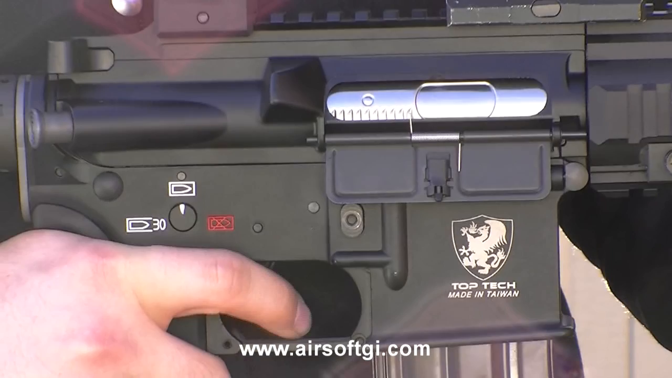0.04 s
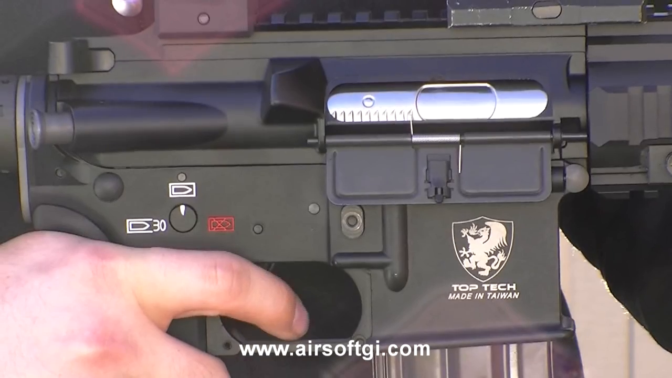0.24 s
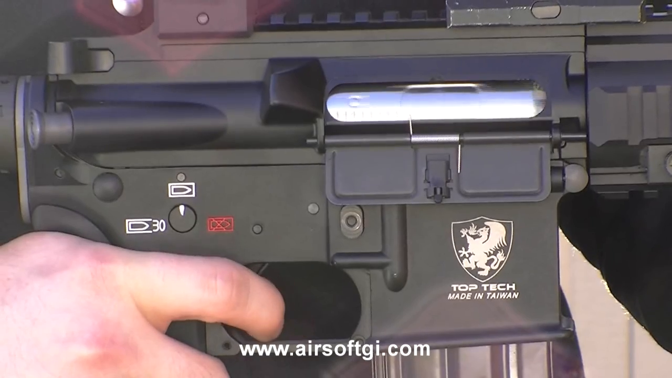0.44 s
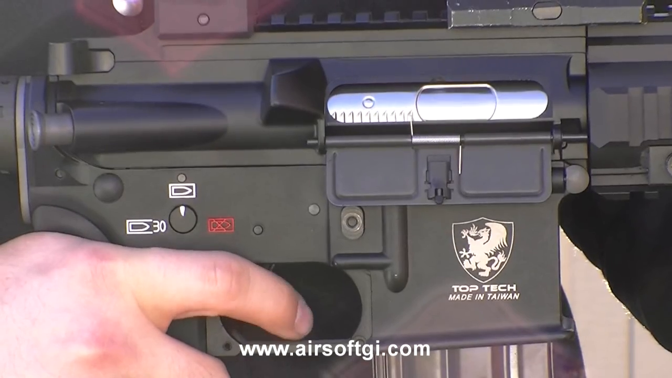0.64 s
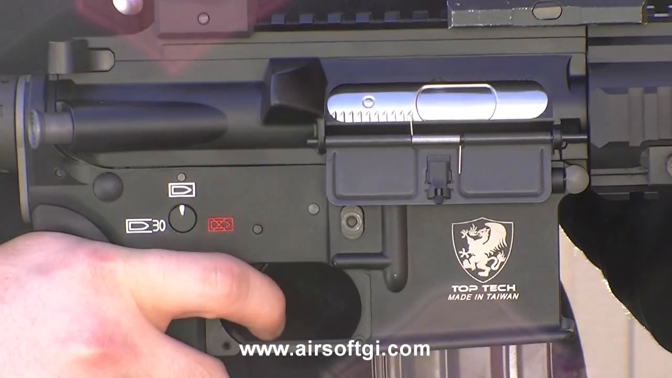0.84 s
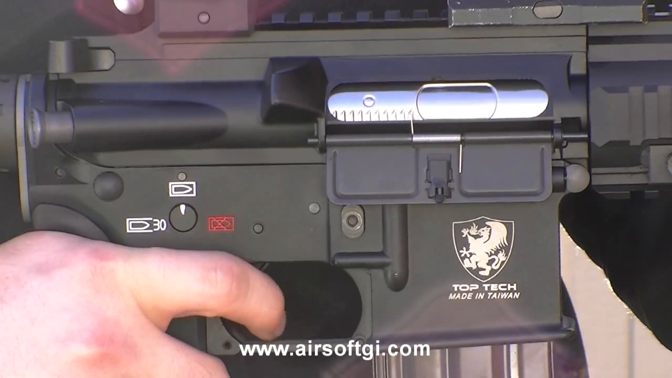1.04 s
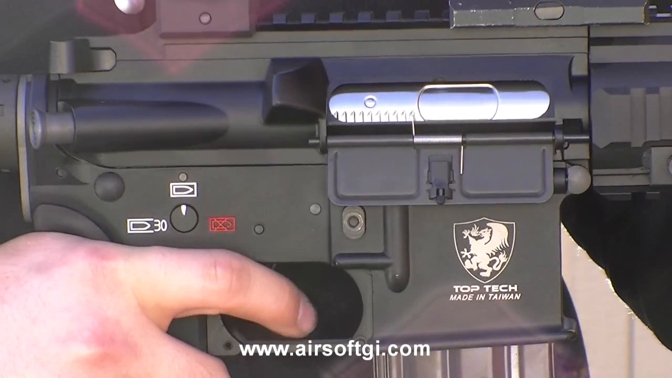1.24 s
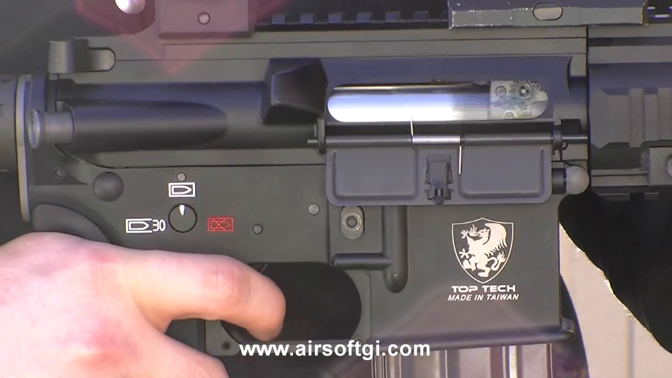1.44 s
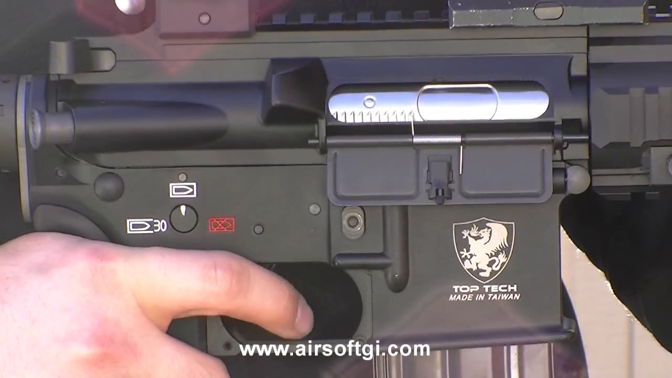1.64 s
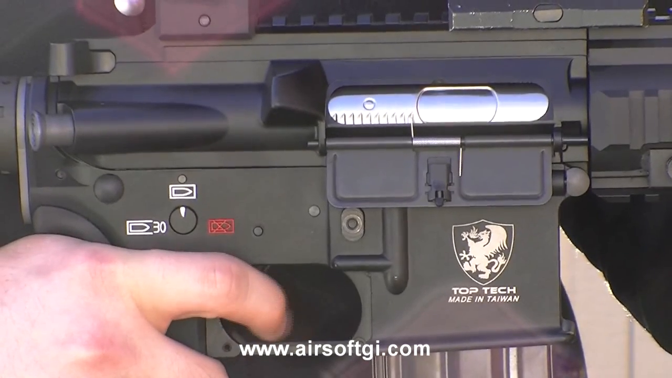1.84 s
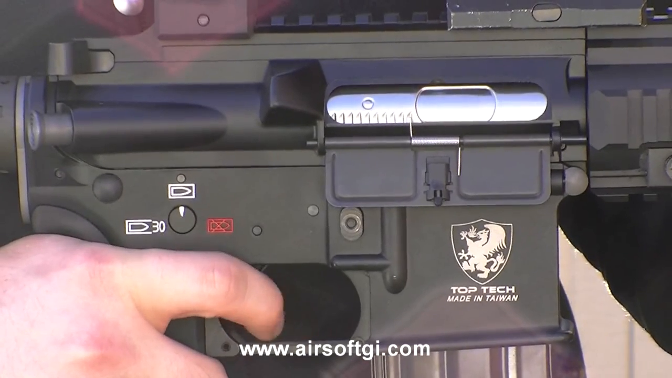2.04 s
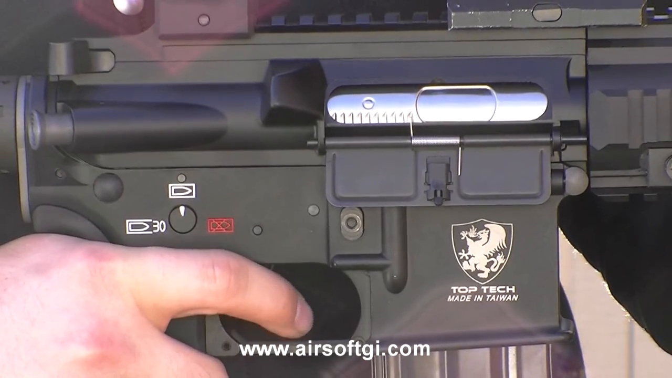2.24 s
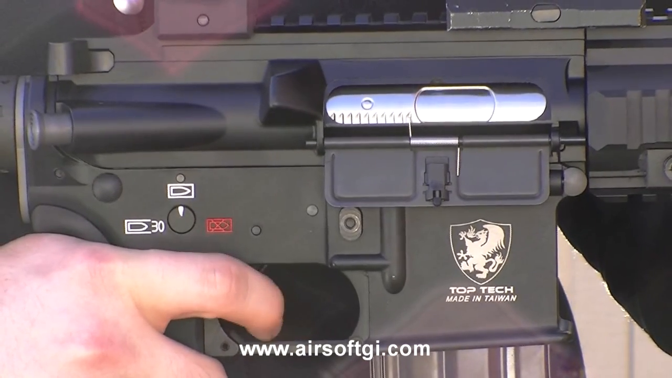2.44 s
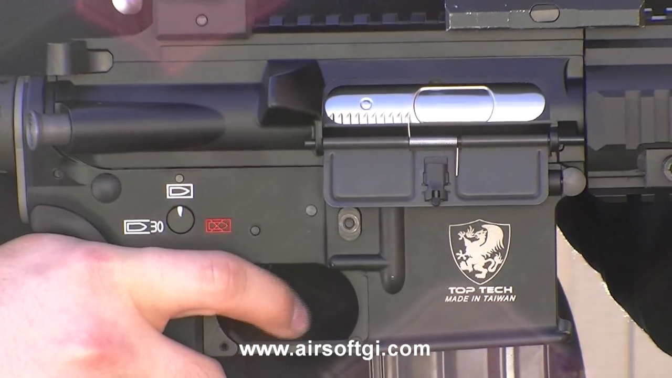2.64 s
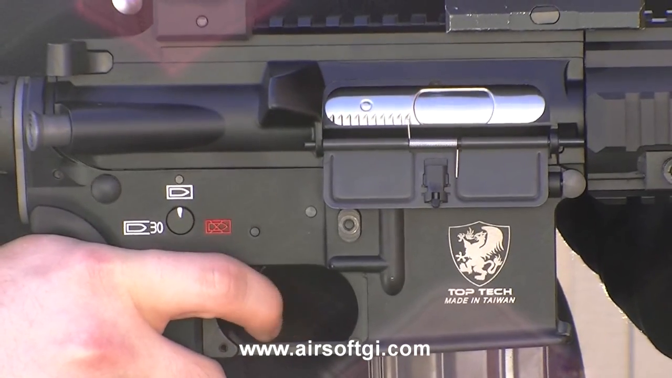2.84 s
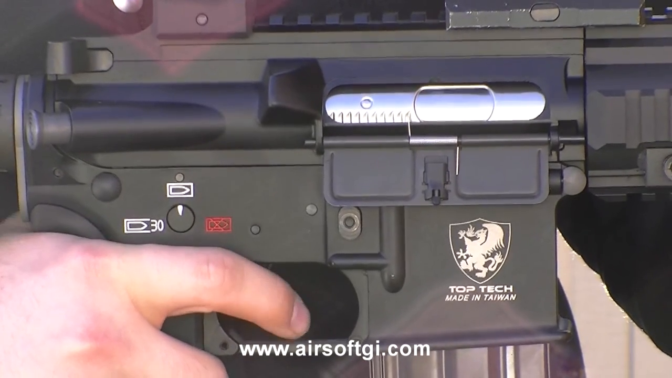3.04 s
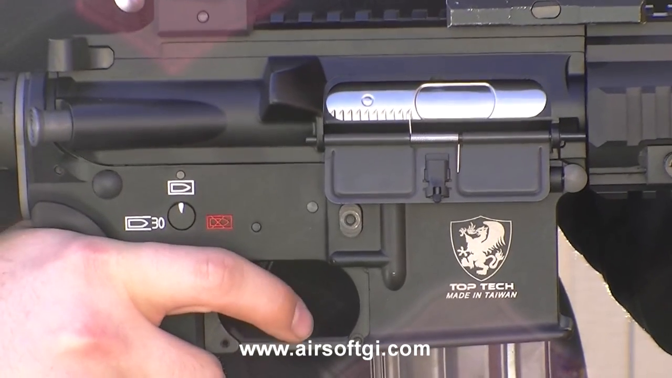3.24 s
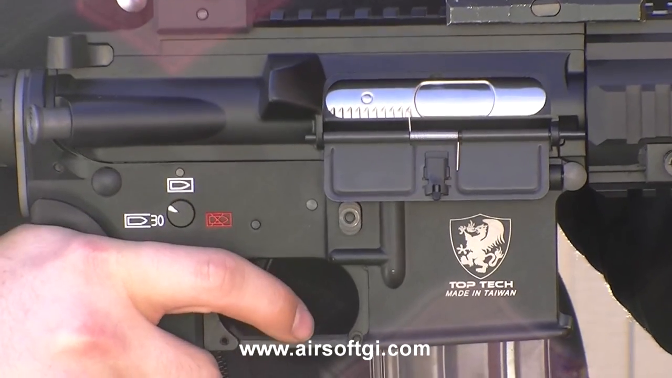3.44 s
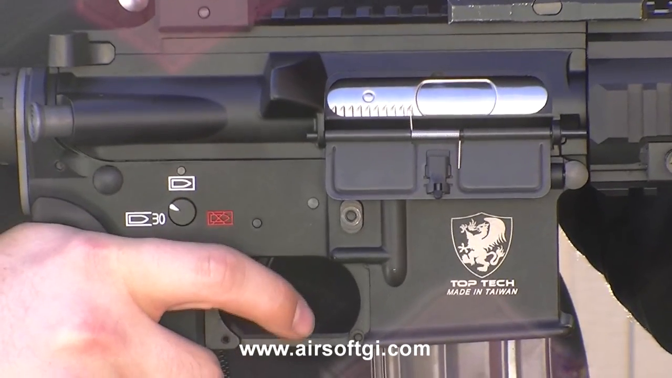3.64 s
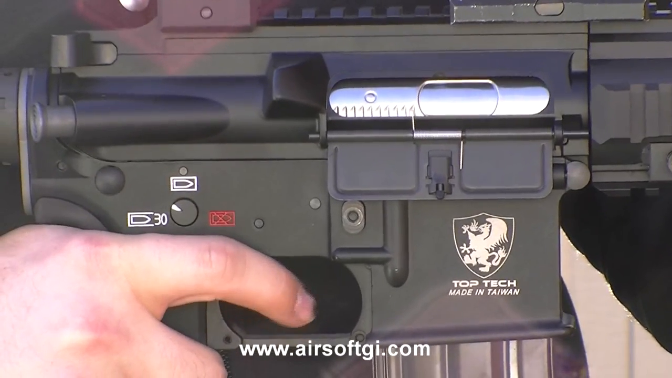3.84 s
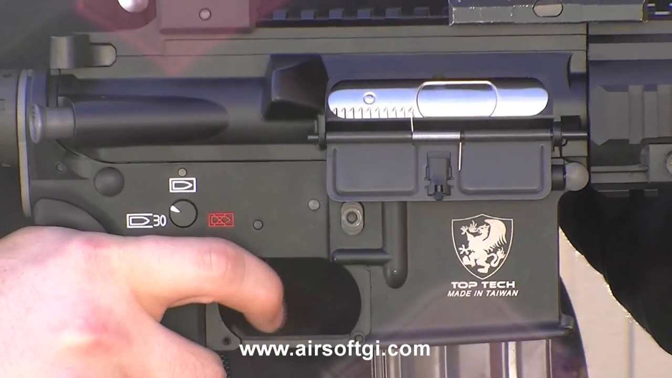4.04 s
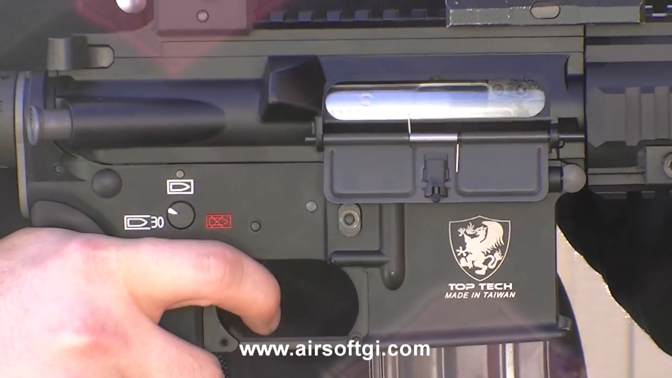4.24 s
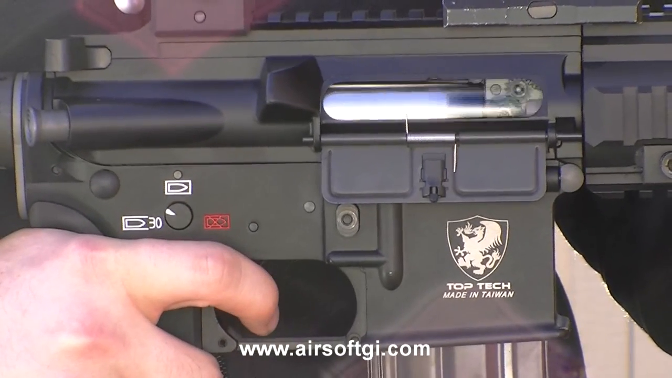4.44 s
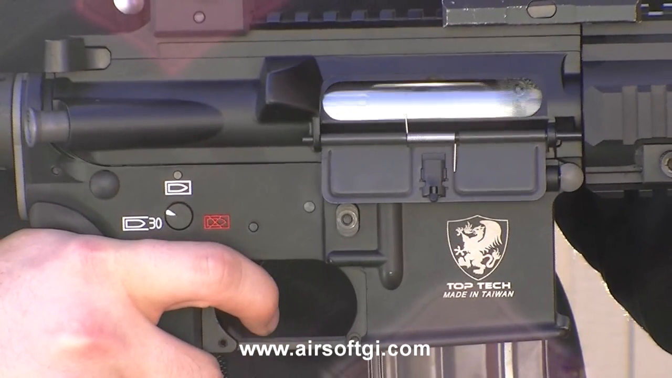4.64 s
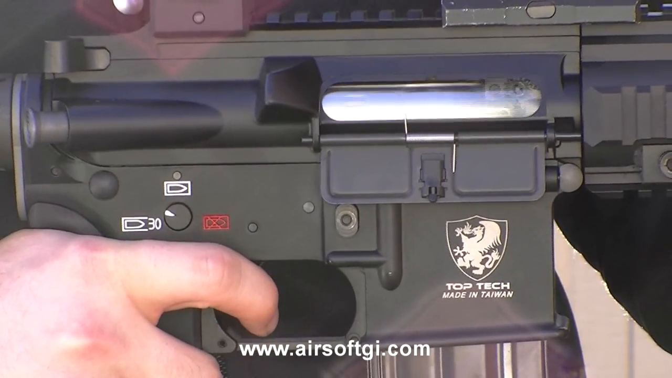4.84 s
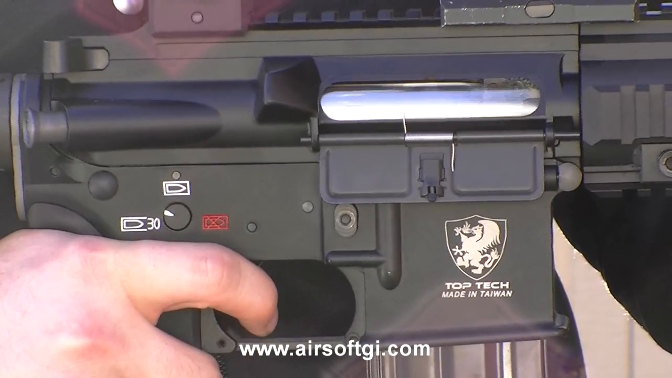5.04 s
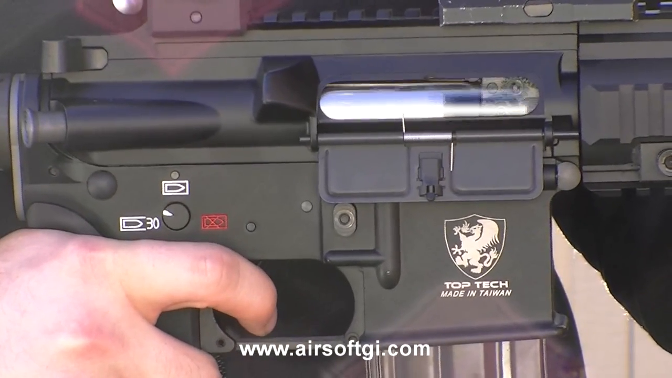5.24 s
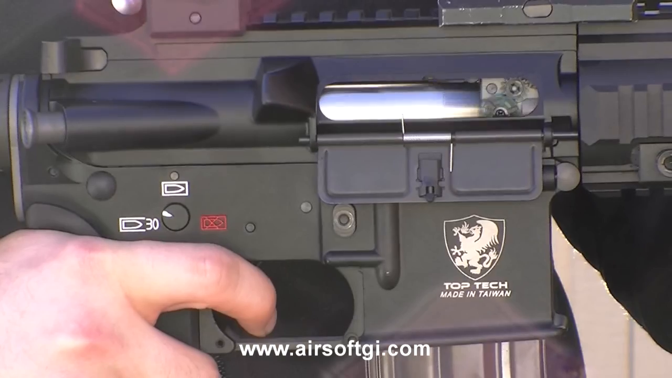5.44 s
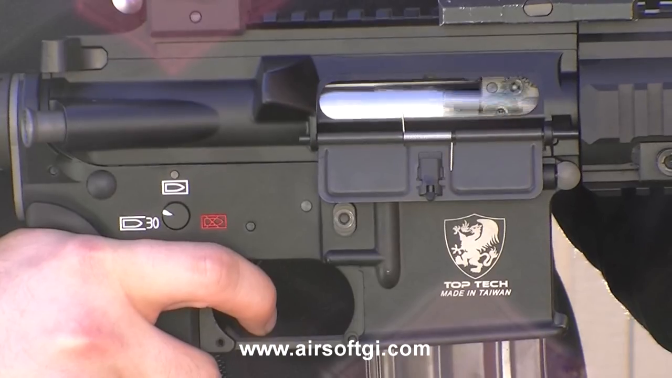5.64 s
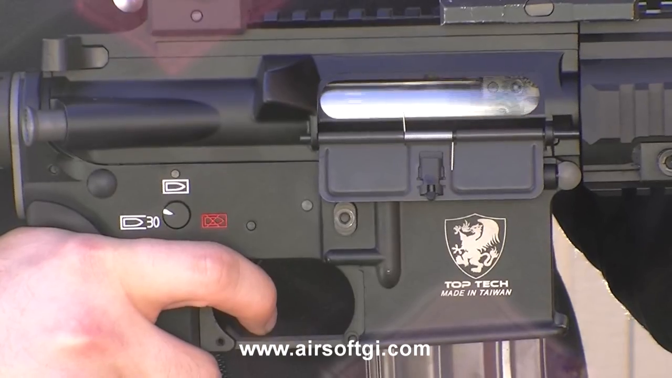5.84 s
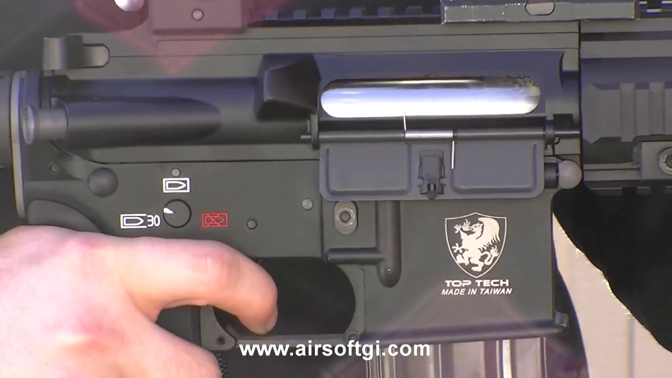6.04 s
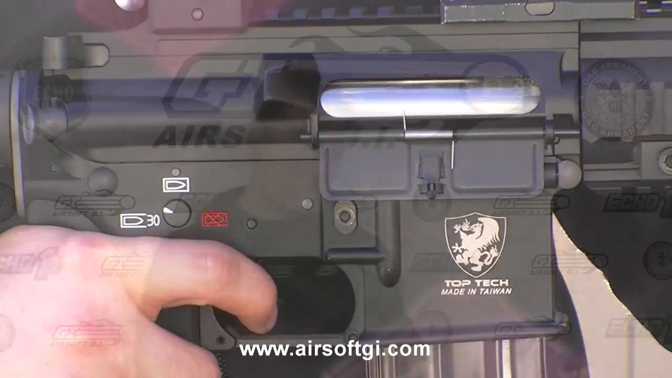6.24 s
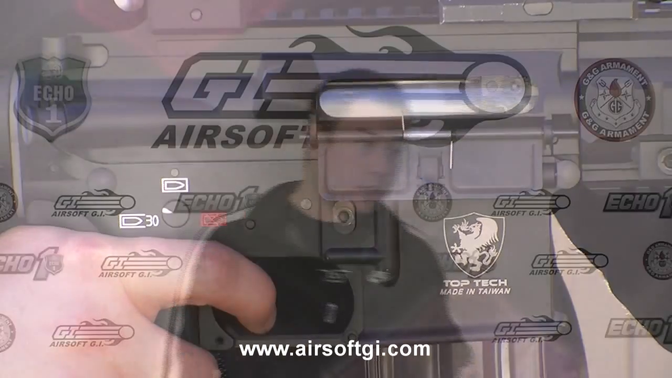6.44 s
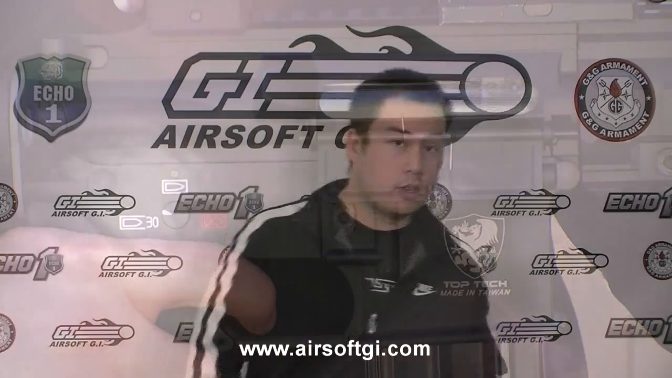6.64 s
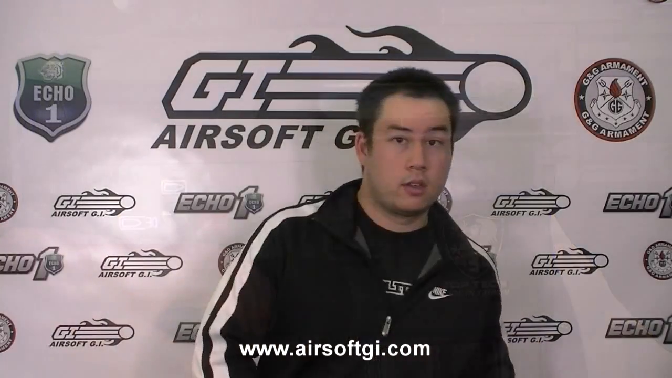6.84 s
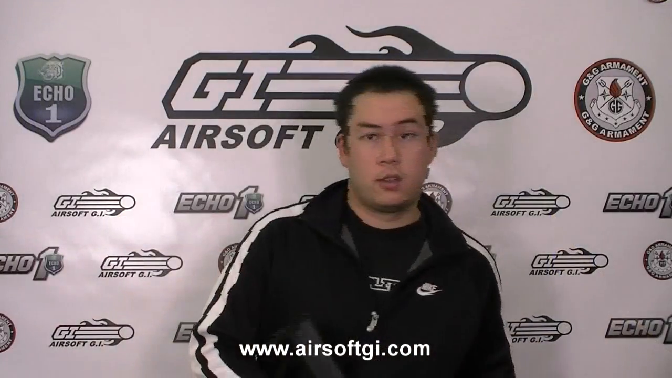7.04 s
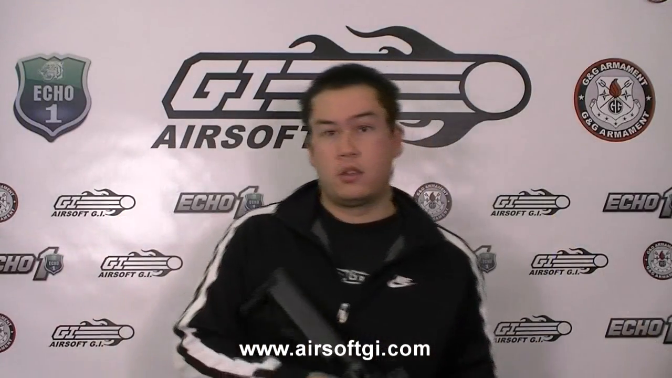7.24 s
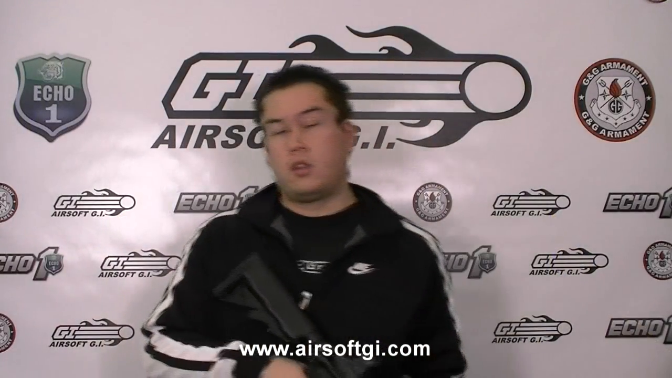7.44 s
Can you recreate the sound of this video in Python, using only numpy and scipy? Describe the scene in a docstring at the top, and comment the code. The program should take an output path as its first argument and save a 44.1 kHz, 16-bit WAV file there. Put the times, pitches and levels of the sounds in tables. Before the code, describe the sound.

An electric airsoft rifle fires six single shots about half a second apart, each a brief gear whir, a sharp piston crack and a bright snap of the bolt cover. Loose pellets rattle hollowly between shots. After a pause with a few faint ticks, a long, fast automatic burst clatters over churning gears and fades away, leaving a quiet room hum. The rifle is right beside a stereo microphone.

```python
"""Electric airsoft rifle

A rifle beside a stereo microphone fires six single shots, then a long burst that fades out.
In each cycle gears wind the spring, the piston slams and the bolt cover snaps back; the impacts
excite damped modes. Between shots loose pellets knock and rattle in a resonant hollow box,
trigger and selector tick, and a thin whistle sounds. A quiet indoor hum remains at the end."""
import sys
import numpy as np
from scipy import signal
from scipy.io import wavfile
from scipy.ndimage import uniform_filter1d

SR = 44100
rng = np.random.default_rng(int(sys.argv[2]) if len(sys.argv) > 2 else 0)


def to_wav(sig):
    """Store sig (one row per channel, or 1-D mono) as 16-bit WAV at the path in sys.argv[1].

    Samples outside -1..1 are clipped; the rate is SR.
    """
    pcm = np.clip(np.atleast_2d(sig), -1, 1) * 32767
    pcm = np.round(pcm).astype(np.int16)
    wavfile.write(sys.argv[1], SR, pcm.T)  # frames by channels


N = 331191
TIME = np.arange(N) / SR

# piston impacts: (time [s], level [dB], twin crack at the muzzle re slam [dB], bolt cover level [dB])
SHOTS = [(0.4324, -4.6, -1.1, -20), (0.9438, -4.0, -0.6, -20.5), (1.4615, -5.7, -3.2, -20.5),
         (1.9707, -4.2, -1.7, -20), (2.5231, -3.4, -3.3, -20), (2.9305, -5.9, 0.4, -21),
         (4.1525, -3.2, -1.2, -19), (4.2274, -6.4, 1, -38), (4.2958, -4.3, -3.9, -24),
         (4.3571, -7.3, -7.4, -20.5), (4.4188, -9, -2.3, -18), (4.4803, -12.1, -4.1, -18),
         (4.541, -9.1, 2.4, -30), (4.605, -8.2, -0.2, -19.5), (4.6643, -4.8, -2.8, -30),
         (4.7292, -6.1, -1.5, -17.5), (4.7885, -8.5, 0.7, -33.5), (4.852, -7.2, -8.3, -20.5),
         (4.9143, -8.1, -8.8, -24), (4.9766, -8.3, -6.6, -21), (5.0387, -10, -5.1, -21.5),
         (5.1008, -7.7, -9.5, -23.5), (5.1636, -8.9, -5.2, -22), (5.226, -8.1, -9.8, -22.5),
         (5.2884, -8.8, -5.1, -21), (5.3509, -7.1, -11.1, -21.5), (5.4139, -9.5, -13.7, -21),
         (5.4765, -8.6, -9.4, -21.5), (5.5398, -9.2, -8.4, -24), (5.6029, -10.3, -5.9, -22),
         (5.666, -9.8, -5.4, -22), (5.7294, -9.9, -11.6, -23), (5.7929, -10.5, -7.7, -21.5),
         (5.8564, -10.6, -4, -22.5), (5.9199, -9.7, -13, -22.6), (5.9834, -11.4, -7.5, -21.5),
         (6.0469, -7.9, -11.4, -23), (6.1111, -8.1, -8.3, -22), (6.1749, -9.7, -7, -24),
         (6.2388, -9.8, -9.4, -23), (6.3024, -8.5, -11.4, -22.5), (6.3661, -10.5, -10.7, -24),
         (6.4299, -9.8, -8.9, -28), (6.4937, -11.4, -2.2, -21), (6.5564, -11.3, 3, -39),
         (6.622, -9.3, -6.4, -23.5), (6.6863, -10.2, -8.4, -23), (6.7506, -9.6, -5.2, -22),
         (6.8149, -10.4, -4.9, -22), (6.8795, -8.5, -5, -23), (6.9445, -9.2, -10.8, -23),
         (7.0106, -9.5, -6.9, -23)]
FROM_REST = np.arange(len(SHOTS)) < 7  # these shots start with the motor standing
REST_SHOTS_S = np.transpose(SHOTS)[0][FROM_REST]


def amp(db):
    """Amplitude ratio of a level in decibels."""
    return 10 ** (np.asarray(db) / 20)


def unit_rms(x):
    """Normalisation to unit mean power."""
    return x / np.sqrt(np.mean(x ** 2) + 1e-20)


def flutter(span, passes=1):
    """Slow random fluctuation: white noise under a moving average of span samples, at unit rms."""
    noise = rng.standard_normal(N)
    for _ in range(passes):
        noise = uniform_filter1d(noise, span)
    return unit_rms(noise)


def impulse(spectrum, size=1024):
    """Minimum-phase response of (frequency [Hz], gain [dB]) points, by the Hilbert transform."""
    hz, db = np.transpose(spectrum)
    half = np.interp(np.log(np.fft.rfftfreq(4 * size, 1 / SR) + 1), np.log(hz + 1), db)
    log_gain = np.log(amp(np.maximum(np.r_[half, half[-2:0:-1]], -100)))
    return np.fft.ifft(np.exp(np.conj(signal.hilbert(log_gain)))).real[:size]


def excite(force, response):
    """A linear system's output: the convolution of its input and impulse response."""
    return signal.oaconvolve(force, response)[:len(force)]


def coloured(x, spectrum, size=1024):
    """Linear filtering by a spectral envelope."""
    return excite(x, impulse(spectrum, size))


def highpass(x, hz):
    """Second-order Butterworth attenuation below hz."""
    return signal.sosfilt(signal.butter(2, hz, "high", fs=SR, output="sos"), x)


def ringing(modes, size=2048):
    """Free decay of modes (frequency [Hz], bandwidth [Hz], level [dB]), scaled to peak 1."""
    t = np.arange(size) / SR
    ring = sum(amp(db) * np.sin(2 * np.pi * hz * t) * np.exp(-np.pi * width * t)
               for hz, width, db in modes)
    return ring / abs(ring).max()


def train(times, db):
    """Ideal impacts: one-sample impulses at the given times and levels."""
    out = np.zeros(N)
    np.add.at(out, np.minimum(np.round(np.asarray(times) * SR).astype(int), N - 1), amp(db))
    return out


def bursts(times, db, spectrum, rise_s, hold_s, t60, grain_db=1):
    """Amplitude-modulated grainy noise: linear attack, short hold, exponential decay."""
    t = np.arange(4096) / SR
    shape = np.minimum(t / rise_s, 1) * amp(-60 * np.maximum(t - hold_s, 0) / t60)
    grains = rng.standard_normal(N) * amp(grain_db * flutter(20))
    return unit_rms(coloured(grains, spectrum)) * excite(train(times, db), shape)


def envelope(curves, column=1):
    """Smoothed sum of gains from curves of (time [s], level [dB], ...), each silent outside its span."""
    gain = sum(amp(np.interp(TIME, rows[:, 0], rows[:, column], -200, -200))
               for rows in map(np.array, curves))
    return uniform_filter1d(gain, size=130)


def hum():
    """Partial coherence: both channels share most of the room noise and, near the end, a mains tone."""
    spectrum = [(18, -77), (30, -31), (65, -13), (125, -7), (158, -20.5), (229, 0.5), (291, -1.5), (443, 0),
                (858, 1), (1180, -6.5), (1700, -3.5), (2530, -11.5), (10500, -22), (14100, -35),
                (16500, -63)]  # room noise: (frequency [Hz], gain [dB])
    levels = [(0, -52), (4.1, -45), (4.3, -67), (6.4, -52), (7.0, -50.5), (7.51, -49)]  # its course: (time [s], level [dB])
    common, left, right = (unit_rms(coloured(noise, spectrum, size=4096))
                           for noise in rng.standard_normal((3, N)))
    mains = amp(-21) * np.sqrt(2) * np.sin(2 * np.pi * 120 * TIME)
    mains *= envelope([[(6.5, -20), (7.0, 0), (7.51, 0)]])
    return (np.array([common + 0.57 * left, common + 0.61 * right]) + mains) * envelope([levels])


def whistle():
    """Random amplitude modulation broadens a thin tone: at the start, after single shots, at the end."""
    last_glide = [(7.08, 10900, -77), (7.5, 10400, -72)]  # falling tone: (time [s], frequency [Hz], level [dB])
    spans = [[(shot + .09, -62), (shot + .2, -62)] for shot in np.r_[-.1, REST_SHOTS_S[:-1]]]
    times, hz, _ = np.transpose(last_glide)
    cycles = np.cumsum(np.interp(TIME, times, hz, left=10895)) / SR
    gain = envelope(spans) + envelope([last_glide], column=2)
    return np.sqrt(2) * np.sin(2 * np.pi * cycles) * (1 + 0.53 * flutter(200)) * gain


def rattle_levels():
    """Pellets settle, lie in a lull, then stir: curves of (time [s], blows [dB], contact hiss [dB])."""
    # spells of rattling: (start [s], rise [s], level [dB], drift [dB/s])
    spells = [(0.04, 0.082, -23.5, 12), (.58, 0.08, -17.5, -18.5), (1.08, 0.11, -25.5, 37),
              (1.56, 0.13, -23, 38), (2.09, 0.11, -15.5, -9.5), (2.7, 0.13, -23, -5),
              (3.08, 0.13, -15.5, -24.5)]
    settle_s, hiss_db = .06, -15.5
    stirred, lull = (-31, -34.5), (-33.5, -37)
    previous_shots, ends = np.r_[-settle_s, REST_SHOTS_S], REST_SHOTS_S - .0297
    curves = []
    for (start, rise, db, drift), shot, end in zip(spells, previous_shots, ends):
        end_db = db + drift * (end - start - rise)
        curves.append([(shot + .012, *stirred), (min(shot + settle_s, start), *lull), (start, *lull),
                       (start + rise, db, db + hiss_db), (end, end_db, end_db + hiss_db)])
    return curves


def pellets():
    """Impact excitation: dense random blows and loud knocks with trailing flurries ring one hollow box."""
    box_spectrum = [(59, -56), (100, -22.5), (239, -13.5), (301, -23), (366, -2.5), (470, -20), (561, -6.5),
                    (694, -16), (829, 5.5), (1100, -5), (1290, 2.5), (1410, 1), (2240, -6.5), (3320, -16),
                    (7000, -31.5), (9100, -79), (15400, -120)]  # broad box response: (frequency [Hz], gain [dB])
    box_modes = [(379, 10, -14), (821.3, 23.5, 15.5), (877, 35, -4), (1090, 99, -10), (1310, 32, 15),
                 (1597, 30, 3.5), (2090, 92, 11.5)]  # box resonances: (frequency [Hz], bandwidth [Hz], level [dB])
    impacts = [(0.061, -29, -22), (0.087, -8.5, -24), (0.101, -16, -14), (0.12, -2.5, -34),
               (0.141, -15, -10), (0.164, -6, -20), (0.174, -20, -10), (0.222, -16, -17), (0.264, -15, -12),
               (0.281, -7.5, -34), (0.323, -6.5, -22), (0.345, -13, -32), (0.525, -16, -9.5),
               (0.619, -16, -27), (0.648, -11, -22), (0.717, -13, -20), (0.755, -11, -12.5),
               (1.044, -26, 0), (1.121, -13.5, -21), (1.158, -9.5, -32), (1.172, -9, -19), (1.209, -7, -19),
               (1.249, -10.5, -15.5), (1.297, -8, -16.5), (1.365, -17, -26), (1.386, -16, -8),
               (1.602, -16.5, -17), (1.64, -4.5, -32), (1.684, -16, -18), (1.766, -3, -20),
               (1.846, -0.5, -21.5), (2.05, -27, 0), (2.107, -16, -16), (2.14, -13.5, -33),
               (2.211, -19, -5), (2.295, -5, -14.5), (2.357, -13, -14), (2.398, -7.5, -15.5),
               (2.422, -25, -9), (2.444, -28, -15), (2.62, -25.5, -2), (2.716, -18, -38),
               (2.737, -12.5, -39), (2.772, -13.5, -21), (2.813, -7, -34), (3.023, -21, -5),
               (3.107, -9, -38), (3.153, -8, -15.5), (3.203, -36, 6), (3.236, -9.5, -11.5),
               (3.249, -13, -11), (3.369, -12.5, -17), (3.47, -15.5, -10.5), (3.626, -16.5, -12.5),
               (3.777, -20, -25), (4.319, -21.5, 2), (4.629, -9.5, -7.5), (6.653, -24.5, 3.5)]  # single knocks: (time [s], level [dB], treble re knock [dB])
    # contact noise: (frequency [Hz], gain [dB])
    contact = [(2500, 0), (4500, 4), (7000, -3.5), (9000, -0.5), (11500, -12.5), (16500, -53)]
    blows_per_s, clump_s = 1800, .015
    times, db, treble_db = np.transpose(impacts)
    box = impulse(box_spectrum, size=2048)
    box = box / abs(box).max() + amp(-12.5) * ringing(box_modes)
    force = amp(3.5 * np.minimum(rng.exponential(1, N), 5)) * rng.choice([-1, 1], N)
    force *= rng.random(N) < blows_per_s / SR
    blows = unit_rms(excite(force, box))
    levels = rattle_levels()
    clumps = amp(2 * flutter(round(clump_s * SR), passes=2))  # pellets move in clumps
    bed = envelope(levels) * clumps * amp(-6.5)
    flurry = excite(train(times, db - 15.5), amp(-60 * np.arange(6000) / SR / 0.13))
    hiss = unit_rms(coloured(unit_rms(force) + 1.32 * rng.standard_normal(N), contact))
    hiss *= envelope(levels, column=2) * clumps * amp(-8)
    knocks = excite(train(times, db - 5), box / abs(box).max())
    clicks = bursts(times, db + treble_db - 5, contact,
                    rise_s=.00026, hold_s=.0011, t60=.088, grain_db=5.5)
    return blows * (bed + flurry) + hiss + knocks + clicks


def trigger_and_selector():
    """Brief contacts have broad spectra: each bright tick is a pair of short noise bursts."""
    ticks = [(0.0802, -15.5), (0.63, -15.5), (1.15, -16), (1.6476, -17), (2.151, -16), (2.6683, -30),
             (2.6814, -17.5), (3.731, -26.5), (3.8243, -29), (3.919, -32.5), (3.939, -34.5), (4.0577, -34)]  # contacts: (time [s], level [dB])
    spectrum = [(3000, -6.5), (6000, 4), (8000, 6.5), (11000, -1.5), (14000, -9), (16500, -25)]  # tick noise: (frequency [Hz], gain [dB])
    times, db = np.transpose(ticks)
    return bursts(np.r_[times, times + .0046], np.r_[db - 6, db - 11], spectrum,
                  rise_s=.0006, hold_s=.001, t60=.025)


def gears():
    """Gear meshing: shaft harmonics and tooth-modulated noise rise as the motor spins up from rest."""
    windup = [(-.093, -46, -38), (-.05, -26, -24.5), (-.011, -23.5, -18.5)]  # winding the spring: (time from slam [s], grind [dB], whine [dB])
    harmonics = [(1, -13), (3, 0), (6, -2), (8, -15), (12, -14)]  # gear whine: (multiple of shaft frequency [1], level [dB])
    grind_spectrum = [(150, -22), (300, -24), (700, -12.5), (1200, -6.5), (2500, -5.5), (4000, -7.5),
                      (6500, -12), (10000, -15.5), (12500, -31), (16500, -53)]  # tooth noise: (frequency [Hz], gain [dB])
    free_shaft_hz, spin_up_s = 537, .025
    coast_s, coast_db = .013, -10  # gears run on briefly after the release
    windups = [[(shot + offset, *db) for offset, *db in windup] for shot in REST_SHOTS_S]
    hz = np.zeros(N)
    for rows in windups:
        since = np.maximum(TIME - rows[0][0], 0)
        spin_up = 1 - np.exp(-(since / spin_up_s) ** 1.3)
        sag = 1 - 1.5 * np.clip(since - .065, 0, .1)  # the spring's load slows the shaft
        hz = np.where(since > 0, free_shaft_hz * spin_up * sag, hz)
    jitter = 1 + .08 * uniform_filter1d(rng.standard_normal(N), size=150)
    turns = np.cumsum(hz * jitter) / SR
    whine = sum(amp(db) * np.sin(2 * np.pi * k * turns) for k, db in harmonics)
    coasting = [rows + [(rows[-1][0] + coast_s, rows[-1][1] + coast_db, 0)] for rows in windups]
    teeth = rng.standard_normal(N) * (0.48 + np.exp(-(3 * turns % 1) / 0.13))
    grind = unit_rms(coloured(teeth, grind_spectrum)) * amp(5)
    return whine * envelope(windups, column=2) + grind * envelope(coasting)


def piston_release():
    """Sudden unloading: after a wind-up from rest the gear lets the piston go with a squeak and a thud."""
    # squeak: (frequency [Hz], gain [dB])
    spectrum = [(3000, -6.5), (6000, -9.5), (7100, 2), (8200, -13.5), (11000, -10.5), (16500, -40)]
    times = REST_SHOTS_S - .0082
    squeak = bursts(times, -12.5, spectrum, rise_s=.0008, hold_s=.002, t60=.022)
    thud = excite(train(times, -25), ringing([(260, 110, 0), (600, 250, -2)]))
    return squeak + thud


def piston_slams():
    """Impulse response: slam, muzzle twin and rebounds each crack, thump and ring the receiver."""
    rebounds = [(1.9, -15), (2.6, -14), (3.4, -17), (4.45, -2.5), (6.2, -13), (7, -16), (8.9, -12),
                (10.5, -16)]  # rebounds and near reflections: (delay [ms], level re slam [dB])
    spectrum = [(59, -74), (100, -24.5), (922, -12.5), (1510, 2.5), (2410, 2.5), (2920, 4.5), (3540, 1.5),
                (4030, -4), (5320, 0), (6870, -7.5), (9670, -6.5), (14500, -20), (16500, -120.5)]  # crack and noisy tail: (frequency [Hz], gain [dB])
    receiver_modes = [(1470, 170, -54), (1600, 190, 2), (2050, 200, -31), (2370, 220, -1.5),
                      (2920, 220, -21), (3020, 67, -6), (4940, 88, -9), (6050, 250, 2.5), (8170, 370, 33)]  # resonances: (frequency [Hz], bandwidth [Hz], level [dB])
    edge_levels = [(0, -1), (4.15, -0.5), (4.35, -3), (5, -2.5), (7.1, -6)]  # the crack's bright edge: (time [s], level [dB])
    times, db, twin_db, _ = np.transpose(SHOTS)
    scatter = rng.standard_normal((len(times), len(rebounds) + 3))  # shots differ a little
    twin_scatter, edge_scatter, thump_scatter = scatter[:, -3:].T
    twin_ms = np.where(FROM_REST, -.65, .39 + .12 * twin_scatter ** 2)

    def strikes(level):
        """Superposition of each slam, its twin and its rebounds."""
        echoes = sum(train(times + ms / 1000, level + echo_db + 1.6 * scatter[:, k])
                     for k, (ms, echo_db) in enumerate(rebounds))
        return train(times, level) + train(times + twin_ms / 1000, level + twin_db) + echoes

    crack = -impulse(spectrum)  # the first swing is a suction
    low, bright = coloured(crack, [(3500, 0), (5500, -15)]), highpass(crack, 4800)
    receiver = amp(-16) * ringing(receiver_modes, size=1024)
    body = excite(strikes(db + 1), low / abs(low).max() - receiver)
    edge_db = np.interp(times, *np.transpose(edge_levels)) + 3 * edge_scatter
    edge = excite(strikes(edge_db), bright / abs(bright).max())
    low_ring = ringing([(254, 32, 0), (526, 23, 4.5), (744, 34, 15), (860, 130, 20)])
    thump = excite(strikes(db - 18 + 1.5 * thump_scatter), low_ring)
    tail = bursts(times, db - 17, spectrum, rise_s=.001, hold_s=.003, t60=.09)
    return body + edge + thump + tail


def bolt_cover():
    """Secondary impacts: a faint catch follows each slam, then the cover snaps back in a bright rattle."""
    spectrum = [(1180, -26), (2000, -1.5), (3550, -5), (5010, 0.5), (6410, 2.5), (7070, 2), (8070, 1),
                (10200, 5.5), (14500, -10.5), (16100, -26), (16500, -84)]  # cover rattle: (frequency [Hz], gain [dB])
    slam_s, slam_db, _, snap_db = np.transpose(SHOTS)
    after_weak = np.roll(snap_db, 1) < -29  # after a weak snap the next one comes early
    snap_s = slam_s + np.where(FROM_REST, .047, .045) - .005 * after_weak
    return bursts(np.r_[snap_s, slam_s + .027], np.r_[snap_db, slam_db - 30], spectrum,
                  rise_s=.0008, hold_s=.00043, t60=.079, grain_db=3)


def jolts():
    """Structure-borne sound: deep bumps of the held rifle travel through the mount."""
    bumps = [(3.541, -48), (3.699, -52), (3.84, -45.5), (4.132, -51), (4.21, -61), (4.279, -61),
             (4.34, -54), (4.397, -53), (4.461, -53), (4.521, -56), (4.586, -62), (4.708, -52),
             (4.834, -50)]  # jolts: (time [s], level [dB])
    times, db = np.transpose(bumps)
    return excite(train(times + .0145, db), ringing([(85, 35, 0), (140, 29, 0)], size=4096))


def churn():
    """Amplitude-modulated noise: gears and pellets churn grainily under the burst."""
    spectrum = [(88, -47), (150, -8), (287, -4.5), (594, -0.5), (934, 3.5), (1410, 6.5), (1900, -1),
                (2700, 0), (3770, -5.5), (5380, -5.5), (7510, -6), (8620, -3), (13000, -18.5), (15600, -55),
                (16500, -65)]  # running gearbox: (frequency [Hz], gain [dB])
    levels = [(4.16, -26), (4.26, -26.5), (5.05, -30), (7.07, -31.5)]  # its course: (time [s], level [dB])
    grains = rng.standard_normal(N) * amp(2 * flutter(60))
    return unit_rms(coloured(grains, spectrum)) * envelope([levels]) * amp(-4.5)


def scene():
    """Superposition at two capsules: the direct sound is nearly alike, scattered sound decorrelates it."""
    balance = [(60, -12), (150, -2.5), (380, -3.5), (950, -3), (2380, -2.5), (5980, -0.5), (15000, 0)]  # direct sound: (frequency [Hz], left minus right [dB])
    scatter_spectrum = [(40, -31), (150, -23.5), (1500, -17), (4000, -15.5), (8000, -9.5), (16000, -2)]  # scattered sound: (frequency [Hz], gain [dB])
    fade_s = 6.5, 7.068
    rifle = piston_slams() + gears() + piston_release() + churn() + pellets()
    rifle += bolt_cover() + trigger_and_selector()
    rifle = highpass(rifle, 253)  # small parts radiate no deep bass
    direct = rifle * np.interp(TIME, fade_s, [1, 0]) + whistle()
    scattered = coloured(direct * flutter(60, passes=2), scatter_spectrum)
    left, right = (coloured(direct, [(hz, side * db / 2) for hz, db in balance]) for side in (1, -1))
    return np.array([left + scattered, right - scattered]) + hum() + jolts()


def record(dry):
    """Soft saturation rounds the peaks; a linear-phase low-pass limits the bandwidth."""
    limited = 1.6 * np.tanh(dry / 1.6)
    lowpass = signal.firwin(511, cutoff=16500, window=("kaiser", 9), fs=SR)
    return signal.oaconvolve(limited, lowpass[None], "same")


dry = scene()
out = record(dry)
to_wav(out)
```